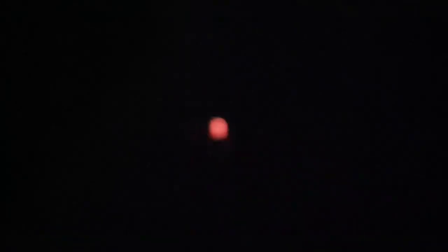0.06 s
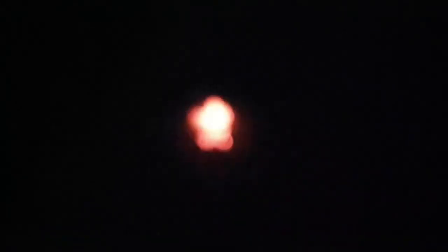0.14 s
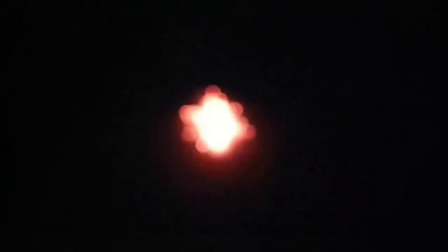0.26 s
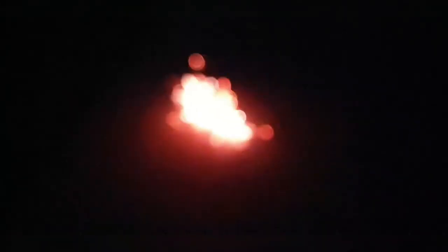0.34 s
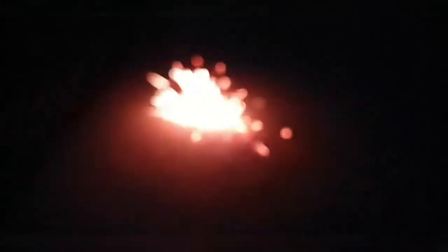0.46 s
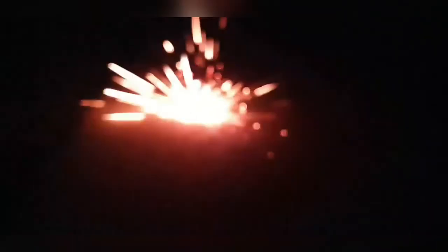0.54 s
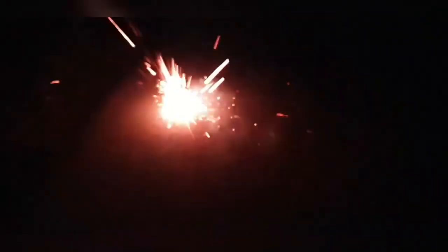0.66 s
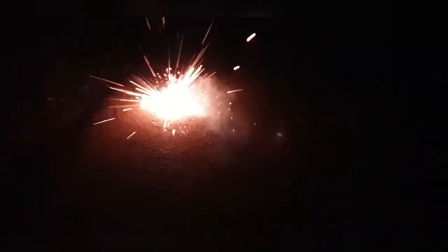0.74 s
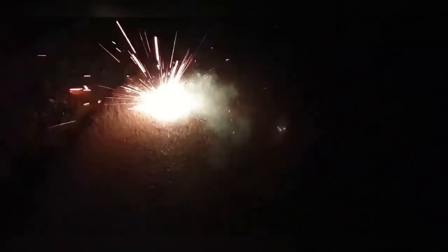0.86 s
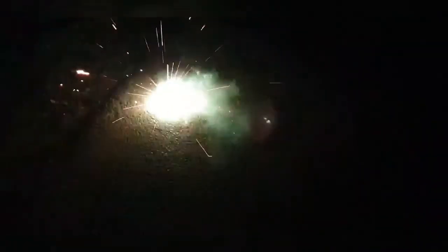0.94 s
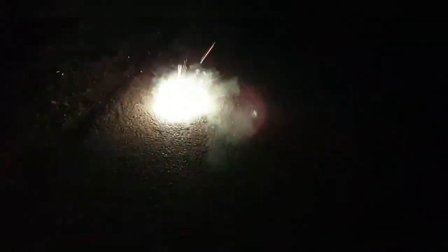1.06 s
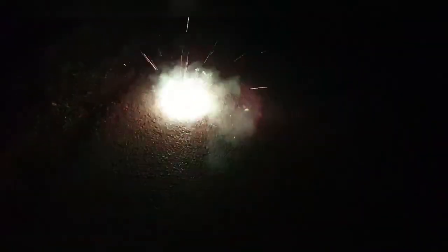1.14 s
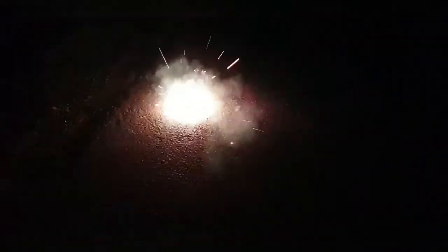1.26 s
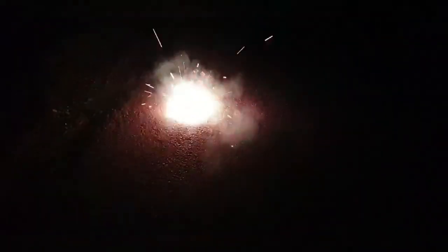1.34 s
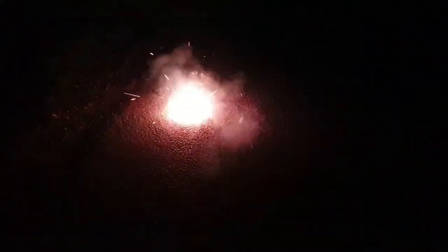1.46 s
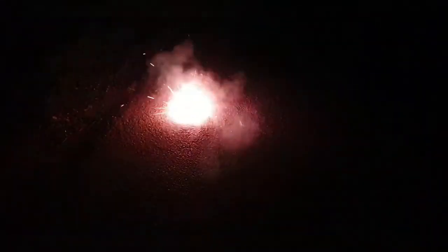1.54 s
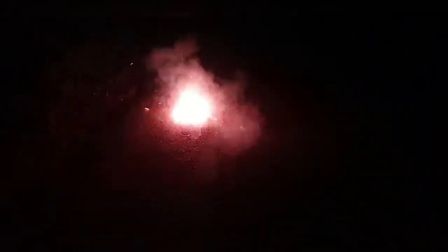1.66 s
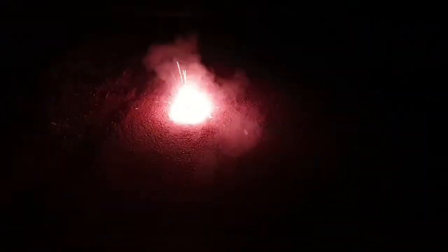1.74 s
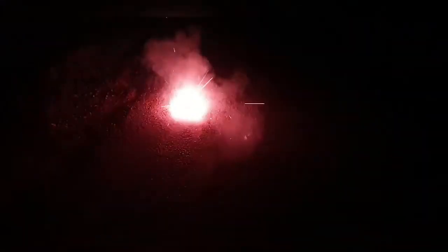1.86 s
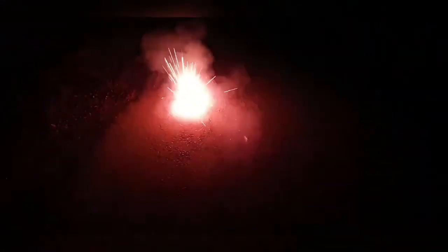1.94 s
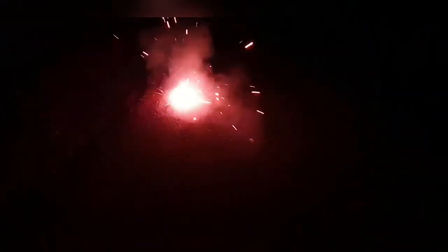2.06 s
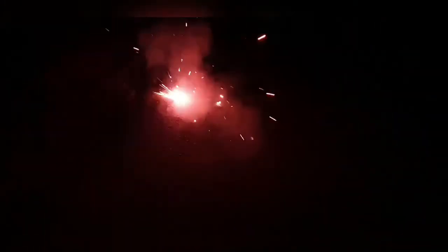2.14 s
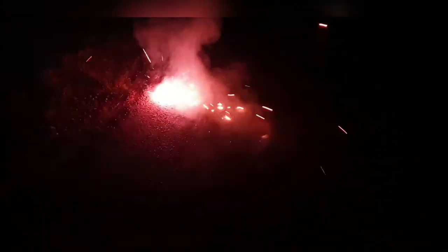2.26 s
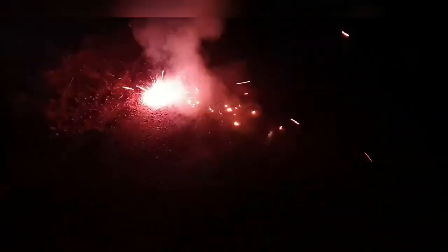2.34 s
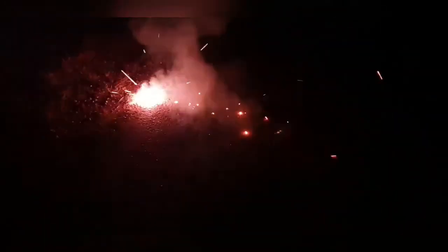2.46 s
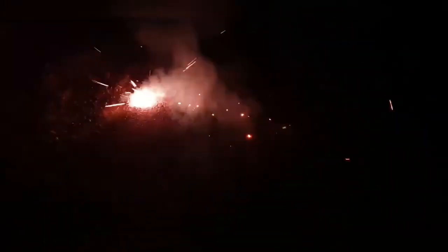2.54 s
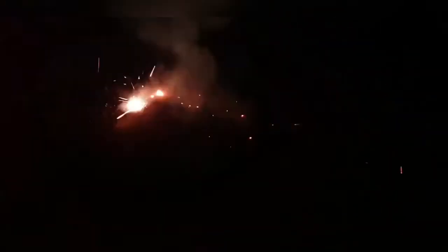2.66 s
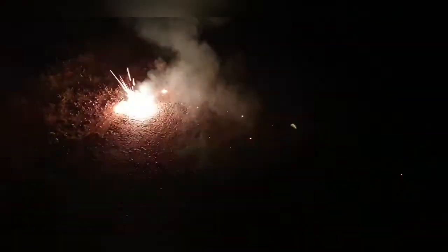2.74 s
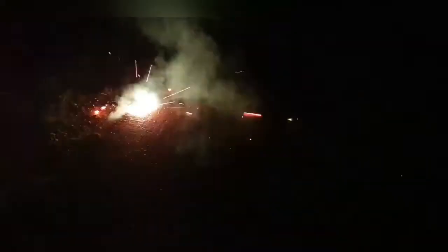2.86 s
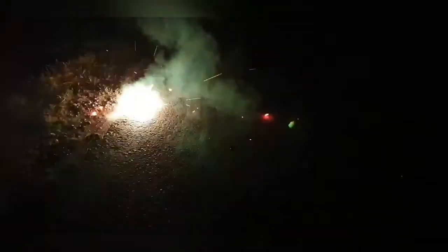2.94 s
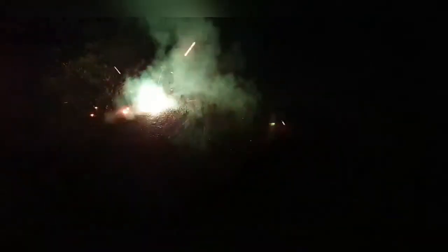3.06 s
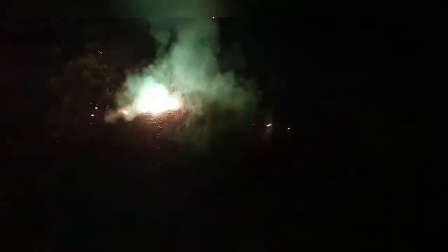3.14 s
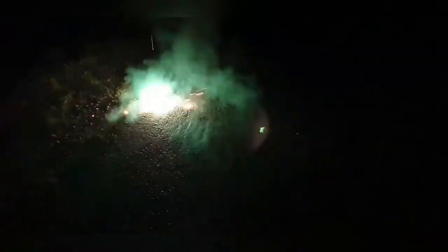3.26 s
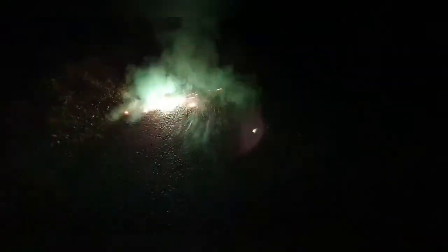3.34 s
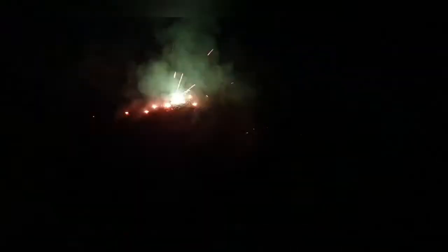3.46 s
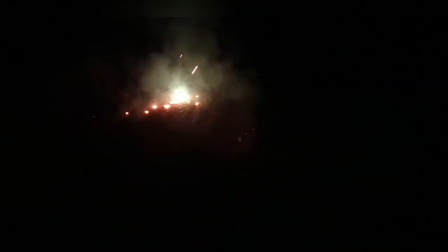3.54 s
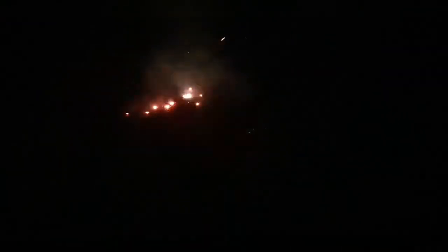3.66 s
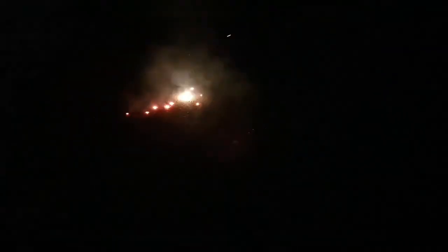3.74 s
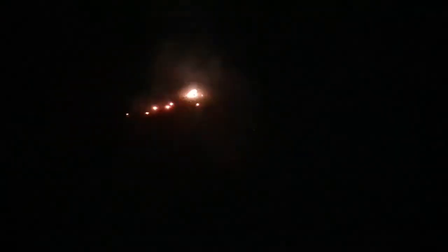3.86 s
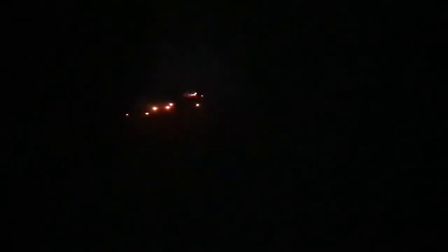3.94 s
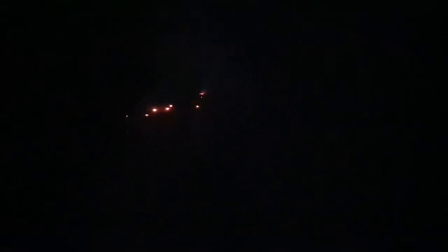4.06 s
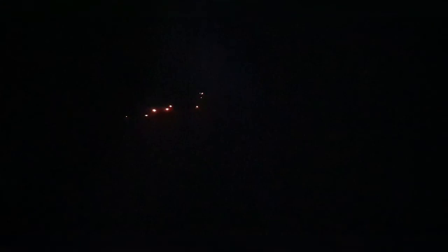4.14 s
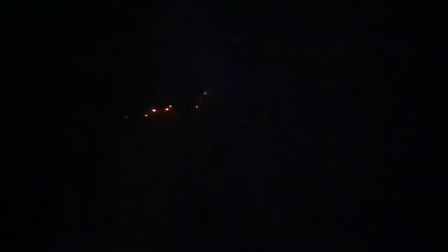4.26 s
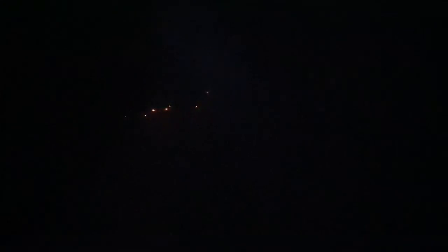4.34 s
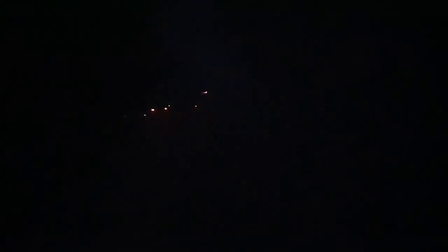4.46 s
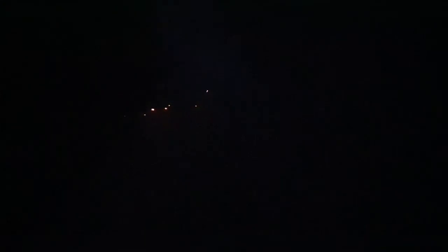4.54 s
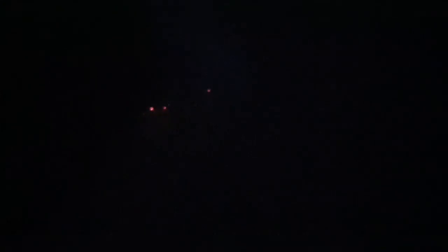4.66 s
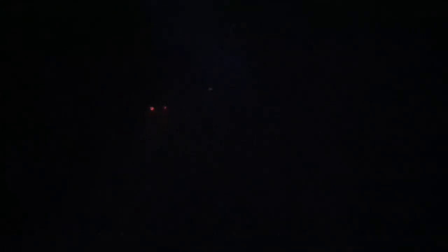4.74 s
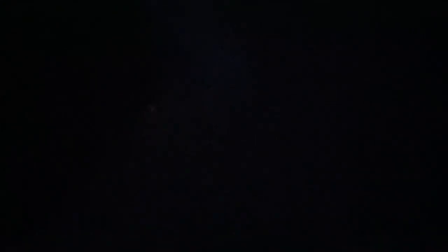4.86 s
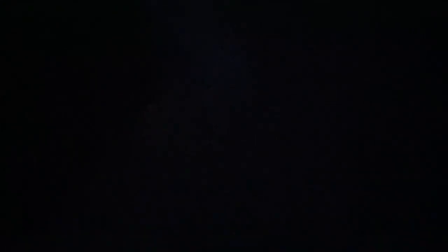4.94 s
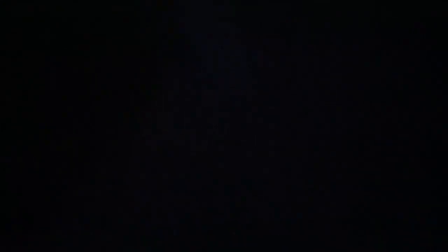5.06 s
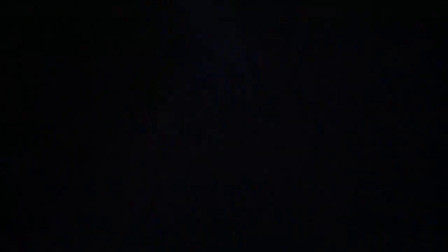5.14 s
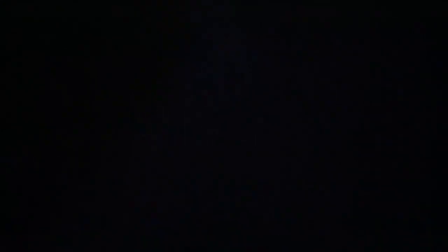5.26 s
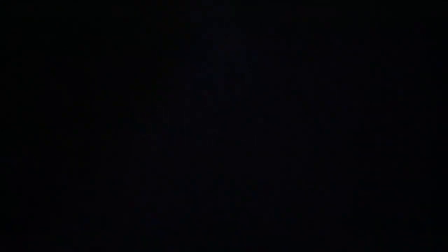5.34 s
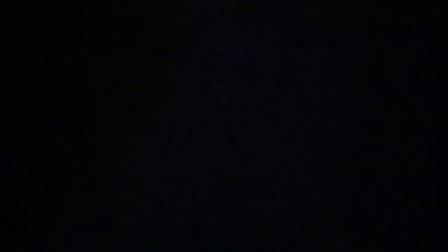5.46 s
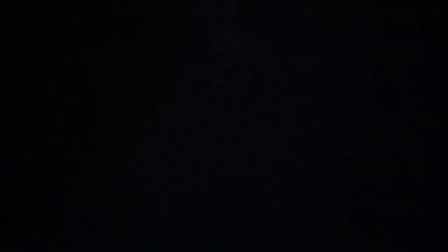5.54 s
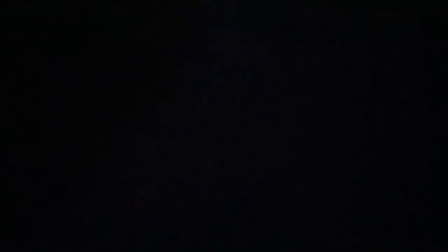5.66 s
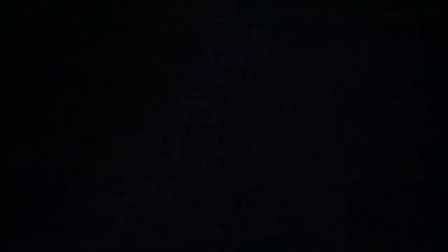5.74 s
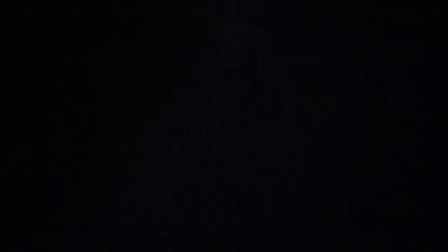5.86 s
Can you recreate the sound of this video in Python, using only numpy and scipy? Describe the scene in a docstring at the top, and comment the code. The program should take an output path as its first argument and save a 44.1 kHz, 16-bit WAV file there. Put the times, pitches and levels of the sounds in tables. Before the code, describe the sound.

Loud fizzing roar of a spinning firework burns for over three seconds, ends in a crisp crack, then faint low droning remains.

```python
"""A small ground firework at night: a fuse fizzes, then filtered noise swells to a loud hiss and roar.
The jet spits, flares and sputters as gain curves drive that noise, over the throb of a spinning flame.
Near the end a grain pops as sparks exciting damped modes; an ember whistles down and the hiss dies.
Throughout, a far engine drones as harmonics of a changing speed, beside a steadier hum and night noise.
Small knocks, damped pulses, touch the hand-held recorder at the start and end; a faint hiss rises last."""
import sys
import numpy as np
from scipy import signal
from scipy.io import wavfile
from scipy.ndimage import uniform_filter1d

SR = 44100
rng = np.random.default_rng(int(sys.argv[2]) if len(sys.argv) > 2 else 0)


def bounce(signal):
    """Save signal as a 16-bit WAV file at the path given by the first command-line argument."""
    frames = np.transpose(np.atleast_2d(signal))
    limited = np.clip(frames, -1, 1)
    pcm = np.round(limited * 32767).astype(np.int16)
    wavfile.write(sys.argv[1], SR, pcm)


N = 260631

# How hard the powder burns, from fuse to jet to embers, and a last faint hiss: start_s, hiss_level_db
JET_LEVEL = [(0, -67), (.23, -65.5), (.26, -55), (.32, -41.5), (.39, -32.5), (.55, -31.5), (.75, -34),
             (1.3, -30.5), (2, -31.5), (2.4, -30.5), (3.1, -31.5), (3.5, -30), (3.65, -37.5), (3.72, -44.5),
             (3.8, -47.5), (3.9, -56), (4.04, -54), (4.17, -84), (5.62, -110.5), (5.7, -80), (5.8, -76),
             (5.83, -68), (5.91, -67.5)]
# Brightness of the jet: start_s, tilt_db (at 10 kHz)
JET_BRIGHTNESS = [(0, 1.5), (.26, -1.5), (.4, -0.16), (1.4, 1.13), (3.4, 0.43), (3.72, -4.5), (4.04, 0.5),
                  (5.91, -0.5)]
# Spectrum of the roar: frequency_hz, density_db (per Hz, relative)
ROAR_SPECTRUM = [(40, -5.5), (85, -3), (170, 9), (300, 11.5), (450, -18.5), (900, -11.5), (2000, -50.5)]
# The flame flares up: middle_s, length_s, hiss_lift_db, roar_lift_db
FLARES = [(0.417, 0.041, 2.5, 11), (0.688, 0.22, 2.5, 8), (0.768, 0.2, 3.5, 5), (0.935, 0.053, 3, 6),
          (1.003, 0.1, 2, 15), (1.2, 0.053, 3, 11.5), (1.31, 0.11, 3, 5.5), (1.406, 0.062, 2, 13),
          (1.562, 0.16, 3, 5.5), (1.742, 0.11, 2, 11.5), (1.857, 0.043, 1, 13.5), (2.03, 0.051, 1, 3.5),
          (2.174, 0.096, 0, 4), (2.76, 0.21, -1.5, 3.5), (2.982, 0.078, 0, 1), (3.4, 0.12, 3, 3),
          (3.6, 0.21, -1, 6)]
# The jet spits; each change peaks SPIT_S later: start_s, lift_db
SPITS = [(.308, -2), (.39, 3), (.422, 0), (.787, 5), (0.806, 5.5), (0.824, 5), (0.838, 3), (0.991, 3.5),
         (1.005, 4), (1.186, -1), (2.234, 7), (2.247, 3), (2.498, 1), (2.946, 7), (3.223, 2), (3.337, 3.5),
         (3.394, 0), (3.428, -2), (3.555, 4.5)]
# The jet chokes briefly: middle_s, depth_db, length_s
SPUTTERS = [(1.781, 3, .03), (2.075, 8, .011), (2.242, 7, .008), (2.287, 9, .013), (2.392, 13, .012),
            (2.439, 10, .012), (2.487, 13, .018), (2.544, 4, .014), (2.597, 6, .014), (2.867, 14, .038),
            (2.968, 6, .015), (3.061, 5, .016), (3.21, 11, .018), (3.27, 10, .022), (3.329, 8, .016),
            (3.385, 15, .019), (3.441, 17, .012), (3.45, 5, .01), (3.576, 13, .019), (3.63, 9, .02),
            (3.69, 6, .02), (3.738, 5, .015)]
ROAR_DB = -12.5  # roar against the hiss
EMBER_DB = -58  # jet level below which the roar falls twice as fast in dB
ROAR_LUMP_DB, FLUTTER_DB = 2.5, 1.3  # rms unevenness of the roar and of the whole jet
PATCHY_DB, WHISTLY_DB = 1.4, 2.6  # rms of broad short patches, and of narrow longer-lived streaks
SPITS_PER_S, SPIT_DB, SPIT_S = 60, 4.5, .002  # random spits: mean rate, largest lift, time scale in s
CHOKE_SPLIT_HZ = 1200
CHOKE_LOW_SHARE = 0.28  # share of the choke depth in dB felt below the split
CHOKE_EARLY = 0.045  # deepest point ahead of the listed middle, in lengths

# The firework creeps along the ground: start_s, frequency_factor (scales the path), moved (0-1)
CREEP = [(0, 1.07, 0), (.9, 1.013, 0), (1.4, 1.022, 0.18), (2.1, 1.01, 0.5), (2.6, 0.992, 0.81),
         (3.3, 1.003, 1.0), (4, 0.96, 0.8)]
# Path to the two microphone ports (ground echo and housing), before and after the creeping:
# frequency_hz, left_db, right_db, likeness (0-1), left_lead_rad
PATH_EARLY = [(60.5, 3, -2, 0.95, 0), (405, -2, -7, 0.85, 0.92), (700, 2.4, -0.5, 0.6, 0.5),
              (1000, -3, -7, 0.6, 0.9), (1430, 3.5, -1, 0.67, 1.4), (1706, 4, -6, 0.8, 0.5),
              (1960, 7, -3.5, 0.33, 2), (2020, 8.5, -6, 0.4, 0.5), (2400, 2, 2, 0.48, 1.2),
              (2750, -1.5, 1.2, 0, -1.3), (3103, 3.5, -0.5, 0, 0.5), (3380, -1, 6, 0.25, -1),
              (3460, 3.6, 4, 0, -1.6), (3870, -1, -7.5, 0.08, 0.5), (4090, 6.5, 2, 0.49, -1.1),
              (4630, 8, 4, 0.9, -1.2), (5160, 3.5, 1, 0.6, 0.5), (5430, 2.5, 0.5, 0.4, -7),
              (5640, 8, 2.3, 0, 8.5), (6200, 1.5, -1, 0, 0), (6900, 12.5, 3.5, 0.2, -2),
              (7940, 5, -4, 0.06, 1.5), (9150, 6, -3, 0.08, 3), (10450, 7.5, -1.5, 0.12, 0.3),
              (12500, 8.5, 1.5, 0.3, 2), (13000, 2, 1.5, 0.31, 1.5)]
PATH_LATE = [(60.7, 0.5, -0.5, 0.93, -0.35), (433, -8, -9, 0.9, 0.72), (723, 4.5, 2, 0.8, -1.2),
             (1025, -1.7, -1, 0.85, 2), (1460, 6, 0.5, 0.66, 1.5), (1700, 9, 4, 0.59, 2.5),
             (1890, 10.5, 1, 0.466, 2), (2040, 11.5, 1.5, 0.59, 1.5), (2480, 2, 1.1, 0.5, 1.5),
             (2686, -3, -1.3, 0.68, 6), (3200, 1.5, 1.5, 0.52, -5), (3220, 6.5, 5, 0.49, 1.5),
             (3660, 1.5, 0.5, 0.935, -5), (3870, 4.5, 2.2, 0.4, 4), (4100, 7.5, -0.5, 0.46, 0.2),
             (4570, 6.5, -1.8, 0.39, -0.4), (5050, 4.5, -1, 0.26, 6), (5200, -0.5, 3, 0.13, 1.5),
             (5760, 4.5, 0, 0.43, 1.5), (6340, 6.5, -6.5, 0.18, -1), (7000, 7, 0.5, 0.314, -3),
             (8160, 1, -5, 0.14, -0.3), (9300, -2, -11, 0.13, 3), (10380, 4.5, -7.5, 0.12, -2.8),
             (11800, -0.9, -3.2, 0.14, -2.5), (13020, -2, -5, 0.25, 0)]
# Narrow bands where left and right are made opposite, thinning the centre of the hiss, one list each:
# start_s, frequency_hz, share (0-1)
OPPOSED_BANDS = [
    [(.25, 3300, .5), (.5, 3600, .35), (.7, 3300, .5), (.85, 3200, .3), (1, 3200, .9), (1.12, 3550, .6),
     (1.4, 3300, .3), (1.9, 3050, .3), (2.05, 3300, .8), (2.27, 3450, 1), (2.35, 3250, .95), (2.5, 3350, 1),
     (2.62, 3600, .8), (3.45, 3600, .7), (3.6, 3300, .9), (3.77, 3250, 1), (3.85, 3300, .5)],
    [(2.15, 2550, 0), (2.23, 2550, .7), (2.45, 2750, .4), (2.6, 2800, 1), (2.78, 2650, 1), (2.92, 2850, 1),
     (3.05, 2650, .9), (3.15, 2800, .9), (3.4, 2750, .9), (3.55, 2700, 0)],
    [(.6, 1650, 0), (1, 1650, .7), (1.3, 1650, .3), (2.4, 1680, .4), (2.85, 1750, 1), (3.1, 1650, .8),
     (3.7, 1680, .6), (3.9, 1680, 0)],
    [(.3, 6300, .3), (.6, 6100, .35), (.75, 5600, .3), (1.4, 5600, .45), (1.8, 5500, .3), (2.2, 5300, .2),
     (2.7, 5350, .45), (3.7, 5200, .3)],
]
OPPOSED_WIDTH = .15  # share of the frequency
SWAY_DB = 3.5  # rms left-right swing of the treble as the nozzle turns
HOLLOW_PATCHY = .3  # random unevenness of the thinning of the centre
HOLLOW_HOP, HOLLOW_HOLD_S = .025, .045  # rms hop as a share of the frequency, time between hops

# Rough low throb of the spinning flame: start_s, frequency_hz, level_db
SPIN = [(.6, 72.3, -72), (.95, 82.5, -49), (1.1, 74.94, -60.5), (1.4, 83.4, -49.5), (1.75, 87.34, -48.5),
        (1.9, 86.5, -57.5), (2.1, 78, -52), (2.3, 68.4, -82)]
# Its harmonics: multiple, level_db (relative)
SPIN_ORDERS = [(1, 0), (2, -2), (3, -2), (4, -9)]
# The last pop and its echo off the ground nearby: start_s, peak_db
POP = [(3.7854, -1), (3.7912, -20)]
# Damped modes of the pop: frequency_hz (nominal), left_db, right_db (relative), t60_s
POP_MODES = [(2330, -3, -3, .022), (2950, 4, 3, .006), (4050, 0, 2, .005), (5200, -4, -4, .002),
             (6450, 7, 0, .004), (7000, -2, 4, .004), (9000, 7, 3, .004), (9900, -4, -2, .003),
             (12500, -3, 5, .004)]
# A dying ember whistles: start_s, length_s, from_hz, to_hz, level_db
EMBER_WHISTLE = (3.848, .045, 2950, 2450, -63)
# Knocks on the recorder: start_s, level_db, tick_db (relative), left_minus_right_db, sharp_share (0-1)
KNOCKS = [(0.1793, -44.5, -2, 21, 0.9), (0.2223, -38.5, -9, 20.5, 0.8), (0.341, -37, -17, 14, 0.8),
          (0.594, -32, -10, 8, 0.9), (4.1262, -34.5, -14, 19, 0.66), (4.1642, -47, -25, 3, .5),
          (4.736, -57, -20.5, 22.5, 0.6), (5.693, -47, -17, 17, 0.33)]
# Far engine: start_s, firing_hz, level_db
ENGINE = [(0, 80, -57), (.6, 80, -61), (2.1, 72, -62), (2.9, 57, -56), (3.25, 56, -56), (3.55, 60, -53),
          (4, 65, -51), (4.44, 70, -51), (4.75, 73, -51), (5.06, 78, -50), (5.3, 81, -51), (5.65, 80, -50),
          (5.91, 72, -51)]
# Its harmonics: multiple, level_db (relative)
ENGINE_ORDERS = [(1, 0), (2, -14), (3, -19)]
# A second, steadier hum: start_s, frequency_hz, level_db
DRONE = [(0, 52, -68), (4.3, 52, -66), (5, 53, -58), (5.91, 52, -58)]

# Distant traffic and hiss: frequency_hz, density_db (per Hz, relative)
NIGHT_SPECTRUM = [(20, -21.5), (45, -9), (110, -5.5), (190, -13), (250, -14.5), (310, -22.5), (590, -33),
                  (1160, -24.5), (1650, -25), (2330, -34), (3000, -45), (8300, -49.5), (9800, -43.5),
                  (13000, -43)]
# Course of the night floor: start_s, level_db, far_hiss_lift_db (near 2 kHz)
NIGHT_LEVEL = [(0, -56.5, 1.5), (4.2, -55.5, 1), (4.55, -57.5, 7), (4.85, -55, -1.5), (5.3, -59, -2),
               (5.78, -56.5, 0), (5.84, -57, 7), (5.91, -58.5, 5)]
# Left-right kinship of the night: frequency_hz, likeness (0-1)
NIGHT_LIKENESS = [(60, 0.91), (180, 1), (530, 0.46), (1570, 0.71), (4650, 0.17), (13000, .2)]
# Airy band lingering after the loudest late knock: start_s, length_s, frequency_hz, width_hz, lift_db
LINGER = (4.17, 0.2, 900, 290, 9)
LEAD_S = .00042  # the night sounds reach the left port first
EDGE_HZ = 13090  # upper edge of the sound


def jet():
    """Turbulent combustion: a broad hiss and a lumpy low roar are noise shaped in frequency and time."""
    def field(hz, t):
        (level_db,), (bright_db,) = curves(JET_LEVEL, t), curves(JET_BRIGHTNESS, t)
        flare_db, whoomp_db = sum(
            np.outer([hiss_db, low_db], np.exp(-(2 * (t - s) / length) ** 2))
            for s, length, hiss_db, low_db in FLARES)
        patches = patchwork(hz, t, bins=6, frames=12)
        streaks = patchwork(hz, t, bins=2, frames=32)
        tilt = bright_db * np.clip(np.log2((hz + 1) / 5000), -1.2, 1.5)
        tilt = tilt - 8 * np.clip(1 - hz / 400, 0, 1)
        hiss = level_db + flare_db + tilt + PATCHY_DB * patches
        hiss = hiss + WHISTLY_DB * streaks * np.clip(hz / 1500, 0, 1)

        sway_db = SWAY_DB * drift(t, 10) * np.clip(hz / 4000, .2, 1) / 2
        left_db, right_db, _ = path(hz, t, sway_db)
        hiss_ports = np.array([hiss + left_db, hiss + right_db])

        # embers hiss but hardly roar
        roar_db = level_db + ROAR_DB + whoomp_db + np.minimum(level_db - EMBER_DB, 0)
        roar = roar_db + read(hz, *np.transpose(ROAR_SPECTRUM)) + ROAR_LUMP_DB * drift(t, 60)
        roar_ports = roar + [[[2.4]], [[-2.4]]]
        # hiss and roar add in power
        return 10 * np.log10(gain_of(2 * hiss_ports) + gain_of(2 * roar_ports))

    t = np.arange(N) / SR
    gas = pair_noise(size=512, field_db=field, likeness=lambda hz, s: path(hz, s)[-1])
    return hollowed(choked(gas * gain_of(unsteady_db(t)), t))


def unsteady_db(t):
    """Amplitude modulation: spits that rise and die within milliseconds, and a quick flutter."""
    kicks = SPIT_DB * rng.random(N) * (rng.random(N) < SPITS_PER_S / SR)
    for s, db in SPITS:
        kicks[round(s * SR)] = db
    spits = signal.oaconvolve(kicks, np.exp(-(t[:600] / SPIT_S - 1) ** 2))[:N]
    return FLUTTER_DB * drift(t, 160) + spits


def choked(gas, t):
    """Interrupted flow: the hiss drops and recovers steeply; the low flame carries on in part."""
    choke_db = sum(
        db * np.exp(-(2 * (t - s + CHOKE_EARLY * length) / length) ** 6)
        for s, db, length in SPUTTERS)
    low = signal.sosfiltfilt(signal.butter(2, CHOKE_SPLIT_HZ, fs=SR, output="sos"), gas)
    return low * gain_of(-CHOKE_LOW_SHARE * choke_db) + (gas - low) * gain_of(-choke_db)


def path(hz, t, sway_db=0):
    """Interference and coherence: left dB, right dB and complex likeness blend as the source creeps."""
    creep, shift = curves(CREEP, t)
    shift = np.clip(shift, 0, 1)
    ends = []
    for rows in (PATH_EARLY, PATH_LATE):
        f, left_db, right_db, same, lead = np.transpose(rows)
        ends.append([read(hz / creep, f, v) for v in (left_db, right_db, same * np.exp(-1j * lead))])
    left_db, right_db, alike = ((1 - shift) * a + shift * b for a, b in zip(*ends))
    left_db, right_db = left_db + sway_db, right_db - sway_db

    # in the opposed bands, left and right are set towards equal level and opposite sign
    near = .85 * opposed(hz, t)
    alike = alike - near * (alike + .997)
    half_db = near * (left_db - right_db) / 2
    return left_db - half_db, right_db + half_db, alike


def opposed(hz, t):
    """Band weights: how fully (0-1) left and right are set opposite around each listed frequency."""
    bands = [curves(band, t) for band in OPPOSED_BANDS]
    rest = [(1 - share * np.exp(-(2 * (hz / f - 1) / OPPOSED_WIDTH) ** 4)) ** 2 for f, share in bands]
    return 1 - np.prod(rest, axis=0)


def hollowed(gas):
    """Mid-channel filtering: the centre of the hiss is thinned in short, hopping narrow patches."""
    hz, t, centre = signal.stft(gas.mean(0), SR, nperseg=1024, noverlap=768)
    patches = patchwork(hz, t, bins=6, frames=8)
    hops = 1 + HOLLOW_HOP * rng.standard_normal(len(t))[(t / HOLLOW_HOLD_S).astype(int)]
    near = opposed(hz[:, None] * hops, t)
    thinning = np.clip(10 * (near * (1 + HOLLOW_PATCHY * patches) - .72), 0, 1)
    return gas - signal.istft(centre * thinning, SR, nperseg=1024, noverlap=768)[1][:N]


def spinning_flame():
    """Periodic modulation: rotation gives a rough low tone with strong harmonics."""
    return hum(SPIN, SPIN_ORDERS, waver=.08, throb_db=4, quick_hz=40)


def pop(thud_db=-31.0):
    """Impulsive excitation: a bursting grain's sparks ring damped modes, over a faint thud."""
    out, t = np.zeros((2, N)), np.arange(2000) / SR
    thin = signal.butter(4, 1800, "high", fs=SR, output="sos")
    for ear, late_s in enumerate((0, .0004)):  # later on the right
        ring = sum(
            gain_of(db[ear] - 60 * t / t60) * np.sin(2 * np.pi * hz * rng.uniform(0.98, 1.02) * t)
            for hz, *db, t60 in POP_MODES)
        spray = rng.standard_normal(len(t)) * gain_of(-60 * t / .01) * (1 - np.exp(-t / .0005))
        spray[40] = 4  # the crack itself, among the sparks
        burst = signal.sosfilt(thin, np.convolve(spray, ring)[:len(t)])
        for s, db in POP:
            out[ear, round((s + late_s) * SR):][:len(t)] += gain_of(db) * burst / abs(burst).max()
    thud = gain_of(thud_db - 60 * t / 0.048) * np.sin(2 * np.pi * 150 * t)
    out[:, round(POP[0][0] * SR):][:, :len(t)] += thud
    return out


def ember_whistle():
    """Frequency glide: a short sine falls quickly in pitch, then levels out."""
    s, length, from_hz, to_hz, db = EMBER_WHISTLE
    u = np.clip((np.arange(N) / SR - s) / length, 0, 1)
    swell = np.sqrt(np.sin(np.pi * u) + 1e-12)
    hz = to_hz + (from_hz - to_hz) * (1 - u) ** 2
    return gain_of(db) * swell * np.sin(2 * np.pi * np.cumsum(hz) / SR)


def knocks():
    """Impulse response: a quick push on the membrane, a slower damped swing back, and a noise tick."""
    out, t = np.zeros((2, N)), np.arange(600) / SR
    push = 1.2 * np.exp(-((t - .0005) / .00026) ** 2)
    swing = -1.1 * np.cos(2 * np.pi * 130 * (t - .0012)) * np.exp(-t / .002)
    swing = swing * np.clip((t - .0004) / .0006, 0, 1)
    for s, db, tick_db, pan_db, sharp in KNOCKS:
        tick = gain_of(tick_db - 60 * t / 0.0042) * rng.standard_normal(len(t))
        ear_db = db + np.array([[pan_db], [-pan_db]]) / 2
        out[:, round(s * SR):][:, :len(t)] += gain_of(ear_db) * (sharp * push + swing + tick)
    return out


def engine():
    """Harmonic series: the far engine sounds at multiples of its changing firing rate."""
    return hum(ENGINE, ENGINE_ORDERS, waver=.008, throb_db=2.5, quick_hz=14)


def steady_hum():
    """Single partial: a second low hum holds a nearly constant pitch."""
    return hum(DRONE, ENGINE_ORDERS[:1], waver=.015, throb_db=2, quick_hz=15)


def hum(rows, orders, waver, throb_db, quick_hz):
    """Harmonic synthesis: multiples of a changing speed that wavers and throbs unevenly."""
    t = np.arange(N) / SR
    hz, level_db = curves(rows, t)
    turns = np.cumsum(hz * (1 + waver * drift(t, quick_hz))) / SR
    late = np.array([[0], [.45]])  # radians: the right port lags a little
    tone = sum(
        gain_of(db + throb_db * drift(t, quick_hz)) * np.sin(2 * np.pi * k * turns - late)
        for k, db in orders)
    return np.sqrt(2) * gain_of(level_db) * tone * gain_of([[1.2], [-1.2]])


def night():
    """Diffuse background: a partly coherent noise floor swells a little."""
    def field(hz, t):
        far_hiss = curves(NIGHT_LEVEL, t)[1] * bells_db([(2100, 700, 1)], hz)
        s, length, f, width, db = LINGER
        fade = (t > s) * np.clip(1 - (t - s) / length, 0, 1)
        lift = far_hiss + fade * bells_db([(f, width, db)], hz)
        return read(hz, *np.transpose(NIGHT_SPECTRUM)) + lift + drift(t, 4)

    def likeness(hz, t):
        same = np.clip(read(hz, *np.transpose(NIGHT_LIKENESS)), 0, 1)
        return same * np.exp(-2j * np.pi * LEAD_S * hz)

    floor = pair_noise(size=2048, field_db=field, likeness=likeness)
    level_db = curves(NIGHT_LEVEL, np.arange(N) / SR)[0]
    return gain_of(level_db) * evened(floor) * gain_of([[1.3], [-1.3]])


def pair_noise(size, field_db, likeness):
    """Partial coherence: two noises from random spectra, with level field_db and complex likeness."""
    hz = np.fft.rfftfreq(size, 1 / SR)[:, None]
    t = np.arange(4 * N // size + 8) * size / 4 / SR
    a, b, c, d = rng.standard_normal((len(t), len(hz), 4)).T
    alike = likeness(hz, t)
    left = a + 1j * b
    own = np.sqrt(np.clip(1 - abs(alike) ** 2, 0, 1))
    z = np.array([left, alike * left + own * (c + 1j * d)])
    noise = signal.istft(z * gain_of(field_db(hz, t)), nperseg=size, noverlap=size - size // 4)[1]
    return noise[:, :N] / np.sqrt(size / 3)


def patchwork(hz, t, bins, frames):
    """Smoothed randomness: unit-rms noise averaged over frequency bins and time frames."""
    grain = rng.standard_normal((len(t), len(hz))).T
    grain = uniform_filter1d(grain, size=bins, axis=0)
    return evened(uniform_filter1d(grain, size=frames, axis=1))


def drift(t, top_hz):
    """Slow chance: unit-rms sines of random phase, weaker towards the top rate."""
    rates = np.geomspace(top_hz / 10, top_hz, num=24)
    return evened(sum(np.sin(2 * np.pi * (f * t + rng.random())) / np.sqrt(f) for f in rates))


def bells_db(modes, hz):
    """Resonance curves: bell-shaped lifts in dB."""
    return sum(db * np.exp(-2 * ((hz - f) / width) ** 2) for f, width, db in modes)


def curves(rows, t):
    """Linear interpolation: each column of a table over time."""
    s, *columns = np.transpose(rows)
    return [np.interp(t, s, c) for c in columns]


def read(hz, points_hz, value):
    """Logarithmic frequency scale: interpolate a spectrum between its points."""
    return np.interp(np.log(hz + 1), np.log(np.asarray(points_hz) + 1), value)


def evened(x):
    """Normalisation: scale to unit rms."""
    return x / np.sqrt(np.mean(x ** 2) + 1e-20)


def gain_of(db):
    """Decibel law: amplitude ratio of a level."""
    return 10 ** (np.asarray(db) / 20)


def scene():
    """Superposition: the pressures of all sources add."""
    firework = jet() + spinning_flame() + pop() + ember_whistle()
    return firework + knocks() + engine() + steady_hum() + night()


def record(dry):
    """Low-pass filtering: nothing is heard above the edge."""
    lowpass = signal.firwin(401, EDGE_HZ, window=("kaiser", 9), fs=SR)
    return signal.oaconvolve(dry, lowpass[None], "same")


dry = scene()
out = record(dry)
bounce(out)
```